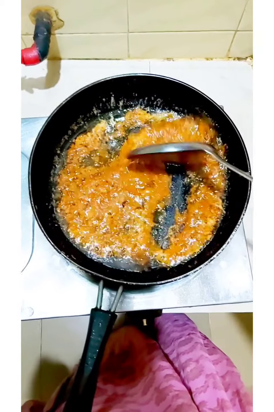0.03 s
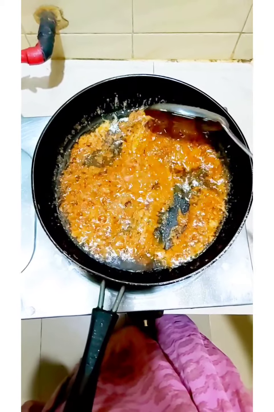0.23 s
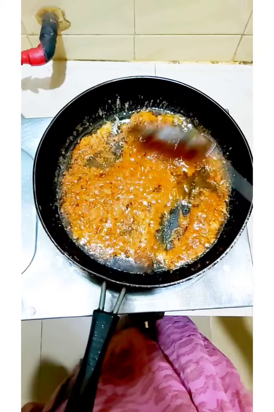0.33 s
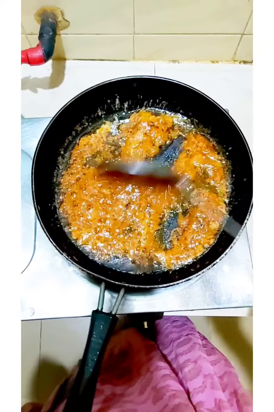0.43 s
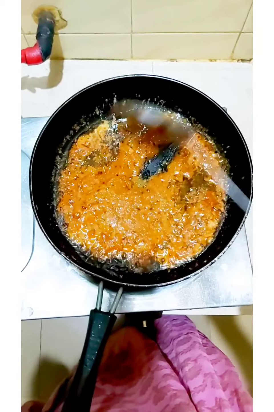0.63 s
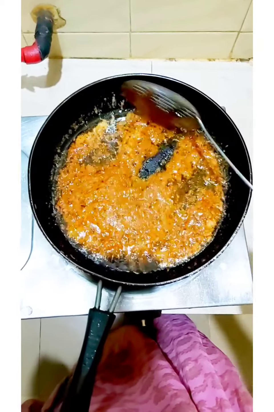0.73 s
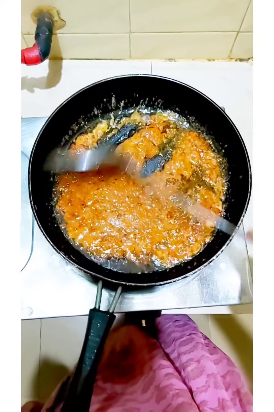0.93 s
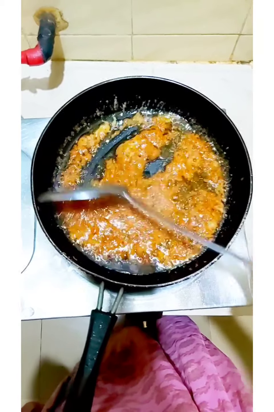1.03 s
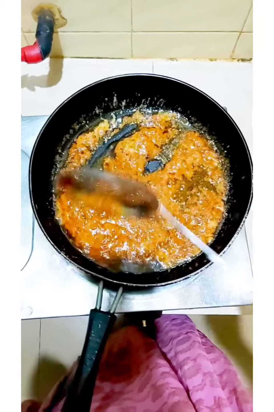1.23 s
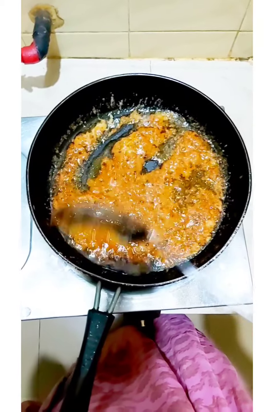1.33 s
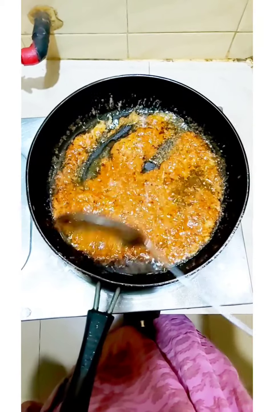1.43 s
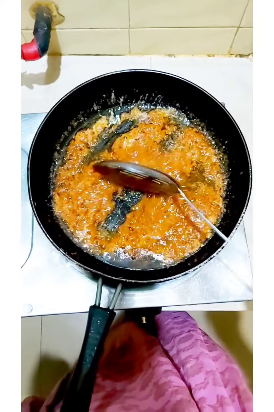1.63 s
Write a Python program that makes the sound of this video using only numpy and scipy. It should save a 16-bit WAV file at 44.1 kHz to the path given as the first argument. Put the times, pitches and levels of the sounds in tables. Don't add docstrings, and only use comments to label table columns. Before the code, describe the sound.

Spoon stirring thick paste in a pan: three dull knocks with gritty scrapes, soft steady sizzle beneath

```python
import sys
import numpy as np
from scipy import signal
from scipy.fft import rfft, irfft, next_fast_len
from scipy.io import wavfile

SR = 44100
rng = np.random.default_rng(int(sys.argv[2]) if len(sys.argv) > 2 else 0)


def log_audio(samples):
    frames = np.atleast_2d(samples).T
    limited = np.clip(frames, -1, 1)
    pcm = np.round(limited * 32767).astype(np.int16)
    wavfile.write(sys.argv[1], SR, pcm)


def undo_db(level):
    steps = np.asarray(level, float) / 20
    return 10 ** steps


N = 74970

# (time [s], peak level [dB], brightness [dB], stove shake [dB])
LANDINGS = [
    (0.2225, -3.5, -0.5, 10),
    (0.7159, -6.5, 7, -4),
    (1.3993, -12, 7, 13.5),
]
# (frequency [Hz], knock level [dB], time to fall 60 dB [s], scrape level [dB], left over right [dB])
PAN_MODES = [(243.3, -27, 0.61, -9.5, 2.5), (341.3, -23, 0.23, -0.2, 3), (429.7, -11.5, 0.12, -2.5, 0.5),
             (505.5, -11, 0.084, -1.5, 3.5), (581.8, -7, 0.12, -1.5, 4), (678, -12, 0.093, -1.5, .6),
             (743, -21.5, 0.097, -10.5, 4), (859, -38, 0.091, -13, 7), (962, -16.5, 0.095, -18.5, 4),
             (1099, -19, 0.078, -9.5, -14.5), (1298, -19, 0.048, -11, -13), (1481, -28, 0.15, -12.5, -8.5)]
SPOON_MODES = [(1852, -39, 0.29, 0.5, 1), (2002, -53, 0.11, -3.5, -1), (2230, -40, 0.11, -9, -5),
               (2310, -36, 0.18, 0.5, -4.5), (2500, -50, 0.15, 3, .3), (2890, -36, 0.19, -2, 4),
               (3622, -35, 0.13, -4, 5), (4040, -30.5, 0.057, -27, 16), (4675, -34, 0.057, -6.5, -9)]
STOVE_MODES = [(47.2, -27.5, 0.16, -10, -8), (91, -56, .35, -17, 7), (166, -55, 0.18, -16, 1)]
# (time [s], pressure as level [dB], speed as brightness [dB])
DRAGS = [
    [(0.26, -18, -35), (0.278, -29.5, -33), (0.296, -24, -21), (0.342, -28.5, -7.5), (0.376, -28, -6),
     (0.422, -31.5, -2), (0.494, -46.5, -1.5), (0.6, -43, -5)],
    [(0.77, -34, -10), (0.796, -28, -22), (0.832, -28, -7), (0.914, -35, -4.5), (1.016, -28, -7.5),
     (1.058, -47.5, -0.5), (1.162, -51.5, -6), (1.17, -54, 0)],
    [(1.44, -28, -16), (1.464, -37, -1.5), (1.526, -38, 2.5), (1.592, -48.5, 2.5), (1.636, -51, -10),
     (1.668, -70, 9), (1.678, -56, -16), (1.7, -52, -15)],
]
# (frequency [Hz], level per Hz [dB])
RASP_COLOUR = [(410, -48), (700, -1), (1120, 0), (1520, -10.5), (2400, -9), (3110, -12), (15500, -28)]
# (time [s], level [dB])
FRYING = [(0.0, -45), (0.388, -46), (0.53, -47.5), (0.762, -46.5), (0.928, -45), (1.288, -47), (1.7, -45)]
# (frequency [Hz], level per Hz [dB])
SIZZLE_COLOUR = [(18, -47), (30, -25), (257, -9.5), (457, -3.5), (713, -3), (1080, -10), (1300, -2.5),
                 (1740, -4.5), (15700, -15.5)]
# (frequency [Hz], likeness [1 = same])
LIKENESS = [(60, 0.34), (240, 1), (950, 0.15), (3770, 0.014), (15000, -0.31)]
# (frequency [Hz], left over right [dB])
LEFT_RIGHT = [(60, 4), (240, 2), (950, -1.5), (3770, 1.5), (15000, 3)]
# (frequency [Hz], phase [rad])
LEFT_LEAD = [(30, .01), (780, .1), (1380, 2.05), (2100, 1.2), (3200, 2.93), (6800, 10.2), (15400, 26.5)]

LANDING_SCATTER_DB, CONTACT_HZ = 3, 1700
DIP_S, DIP_DB = 0.016, -30
CRACK_DB, CRACK_T60_S = -31, 0.029
SPLASH_DB, SPLASH_T60_S = -21.5, 0.13
SLIPS_PER_S, SLIP_SPREAD_DB = 800, 3.5
SPOON_SHARE_DB, RASP_SHARE_DB, STOVE_RUB_DB = -2, 4, -42
SIZZLE_LIFT_DB, POPS_PER_S, POP_SPREAD_DB = 7.5, 9000, 2.5
POP_SHARE = 0.61
KITCHEN_T60_S, KITCHEN_DB, WALL_CUT_HZ = 0.24, -17.5, 4900

TIME_S = np.arange(N) / SR
OPPOSITE = np.array([[1], [-1]])


def spoon_on_pan():
    press, rasp = drag_controls()
    slips_per_s = SLIPS_PER_S * undo_db(3.0 * drift(28.0))
    slips = grains(slips_per_s, SLIP_SPREAD_DB)
    bright_db, shake_db = np.transpose(LANDINGS)[2:]
    pan = ringing_body(PAN_MODES, 0, 0.35 * press * slips)
    spoon = ringing_body(SPOON_MODES, bright_db, 0.34 * undo_db(SPOON_SHARE_DB) * rasp * slips)
    stove = ringing_body(STOVE_MODES, shake_db, undo_db(STOVE_RUB_DB) * press * slips)
    grit = 0.28 * slips + rng.standard_normal((2, 2, N))
    edge_gain = undo_db(RASP_SHARE_DB) * rasp + landing_noise()
    edge = coloured(grit, RASP_COLOUR, patchy_db=1.0, wide=0.96) * edge_gain
    return pan + spoon + stove + edge


def ringing_body(modes, extra_db, rubbing):
    out = 0
    s, db = np.transpose(LANDINGS)[:2]
    for hz, knock_db, t60, scrape_db, pan_db in modes:
        r = undo_db(-60 / (t60 * SR))
        w = 2 * np.pi * hz / SR
        scatter_db = LANDING_SCATTER_DB * rng.standard_normal(len(s))
        force = np.zeros(N)
        force[(s * SR).astype(int)] = -undo_db(db + extra_db + knock_db + scatter_db)
        soft = np.exp(-2 * np.pi * max(CONTACT_HZ, 2 * hz) / SR)
        force = signal.lfilter([1 - soft], [1, -soft], force)
        force = force + undo_db(scrape_db) * 2 * np.sqrt(1 - r) * rubbing
        ring = signal.lfilter([0, np.sin(w)], [1, -2 * r * np.cos(w), r * r], force)
        out = out + undo_db(pan_db / 2 * OPPOSITE) * ring
    return out


def landing_noise():
    out = np.zeros(N)
    for s, db, bright_db, _ in LANDINGS:
        age = np.maximum(TIME_S - s, 0)
        crack = undo_db(CRACK_DB - 60 * age / CRACK_T60_S)
        splash = undo_db(SPLASH_DB - 60 * age / SPLASH_T60_S)
        dip = undo_db(DIP_DB) * np.clip(1 + (TIME_S - s) / DIP_S, 0, 1) ** 0.5
        out += undo_db(db + bright_db) * np.where(TIME_S >= s, crack + splash, dip)
    return out


def drag_controls():
    press, rasp = np.zeros(N), np.zeros(N)
    for rows in DRAGS:
        s, db, bright_db = np.transpose(rows)
        fade_in = np.clip((TIME_S - s[0]) / 0.025 + 1, 0, 1)
        fade_out = np.clip((s[-1] - TIME_S) / 0.019 + 1, 0, 1)
        press += fade_in * fade_out * undo_db(np.interp(TIME_S, s, db))
        rasp += fade_in * fade_out * undo_db(np.interp(TIME_S, s, db + bright_db))
    return press, rasp


def sizzle():
    s, db = np.transpose(FRYING)
    pops = np.array([[grains(POPS_PER_S, POP_SPREAD_DB) for _ in range(2)] for _ in range(2)])
    white = POP_SHARE * pops + (1 - POP_SHARE) * rng.standard_normal((2, 2, N))
    gain = undo_db(np.interp(TIME_S, s, db) + SIZZLE_LIFT_DB)
    return gain * coloured(white, SIZZLE_COLOUR, patchy_db=1.84, wide=0.71)


def kitchen(x):
    size = next_fast_len(N + SR)
    w = 2 * np.pi * np.arange(size // 2 + 1) / size
    dull = 1 / (1 + 1j * w * SR / (2 * np.pi * WALL_CUT_HZ))
    out = np.zeros((2, len(w)), complex)
    lags_s = rng.uniform(0.01, 0.035, 16)
    for k, lag in enumerate(lags_s):
        loop = undo_db(-60 * lag / KITCHEN_T60_S) * dull * np.exp(-1j * w * round(lag * SR))
        out[k % 2] += (-1) ** (k // 2) * loop / (1 - loop)
    return irfft(out * rfft(x, size), size)[:, :N]


def coloured(white, spectrum, patchy_db, wide):
    out = 0
    together = drift(4.0)
    edges = 24 * 2 ** np.arange(0, 9.6, 0.5)
    for k, (low, high) in enumerate(zip(edges, edges[1:])):
        band = signal.butter(2, [low, high], "band", fs=SR, output="sos")
        mid, side = signal.sosfilt(band, white[k % 2])
        hz = np.sqrt(low * high)
        alike = np.clip(1 - wide * (1 - at_hz(LIKENESS, hz)), 0, 1)
        gain = undo_db(at_hz(spectrum, hz) + patchy_db * (0.73 * together + drift(16.3)))
        lean = undo_db(at_hz(LEFT_RIGHT, hz) / 2 * OPPOSITE)
        stereo = np.sqrt(1 + alike) * mid + np.sqrt(1 - alike) * side * OPPOSITE
        out = out + gain * lean * stereo
    return rms_one(out)


def grains(rate, spread_db):
    sizes_db = spread_db * np.minimum(rng.exponential(1, N), 4)
    sizes = undo_db(sizes_db) * rng.choice([-1, 1], N)
    return rms_one(sizes * (rng.random(N) < rate / SR))


def drift(rate):
    r = np.exp(-80 * np.pi * rate / SR)
    chance = rng.standard_normal(N // 40 + 2002)
    slow = signal.lfilter([1], [1, -2 * r, r * r], chance)[2000:]
    return np.interp(np.arange(N) / 40, np.arange(len(slow)), rms_one(slow))


def at_hz(points, hz):
    table = np.array(points)
    return np.interp(np.log(hz), np.log(table[:, 0]), table[:, 1])


def rms_one(x):
    return x / np.sqrt(np.mean(x ** 2) + 1e-20)


def scene():
    spoon = spoon_on_pan()
    room = undo_db(KITCHEN_DB) * kitchen(spoon.mean(axis=0))
    return spoon + room + sizzle()


def roll_off(x):
    return signal.sosfilt(signal.butter(12, 15820, fs=SR, output="sos"), x)


def record(dry):
    size = next_fast_len(N + 4096)
    hz = np.maximum(np.arange(size // 2 + 1) * SR / size, 1)
    lead_hz, lead_rad = np.transpose(LEFT_LEAD)
    turn = np.exp(-1j * np.interp(hz, lead_hz, lead_rad) * np.array([[0], [1]]))
    mix = irfft(rfft(dry, size) * turn, size)[:, :N]
    return roll_off(mix)


dry = scene()
out = record(dry)
log_audio(out)
```